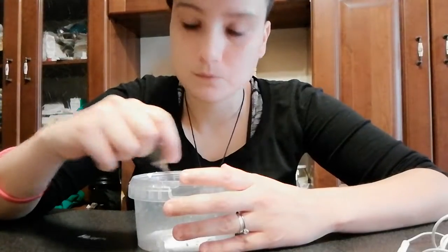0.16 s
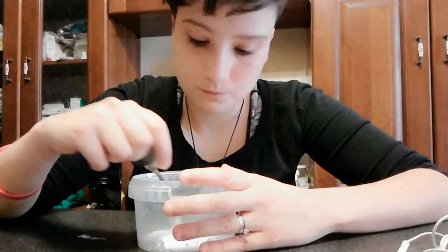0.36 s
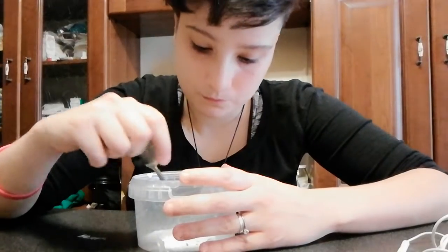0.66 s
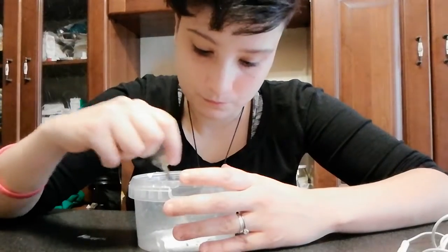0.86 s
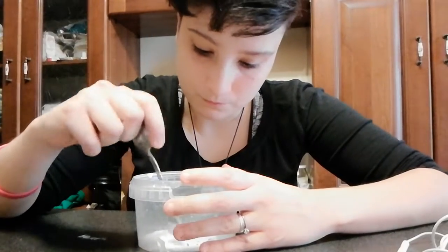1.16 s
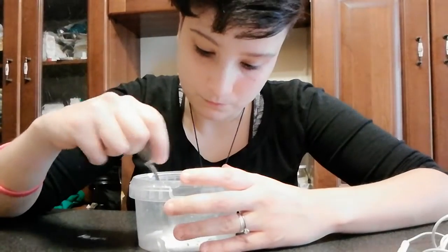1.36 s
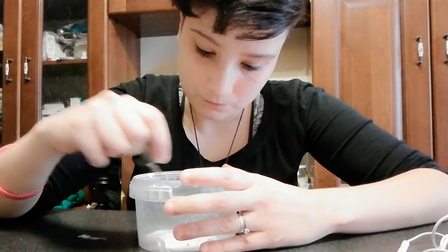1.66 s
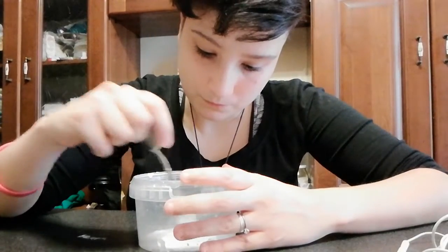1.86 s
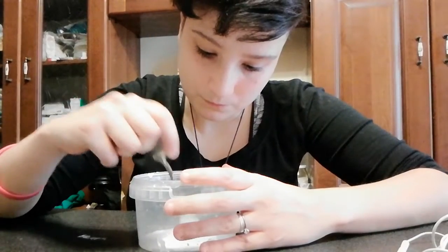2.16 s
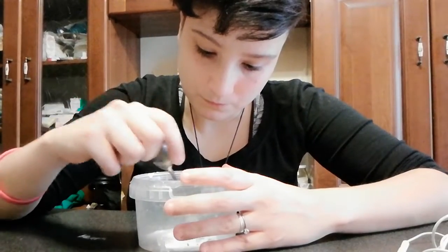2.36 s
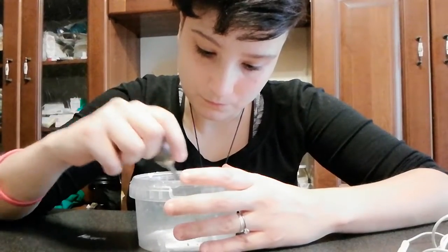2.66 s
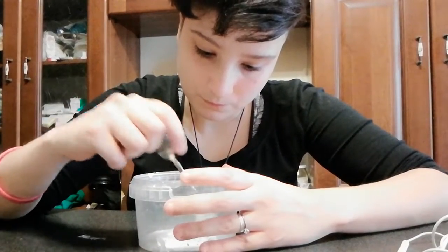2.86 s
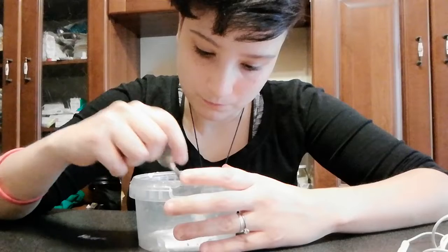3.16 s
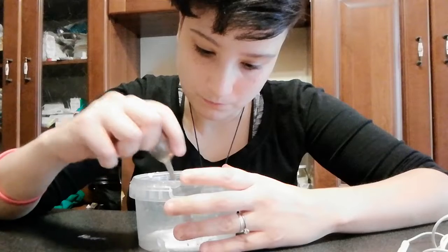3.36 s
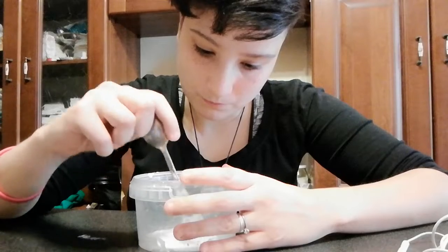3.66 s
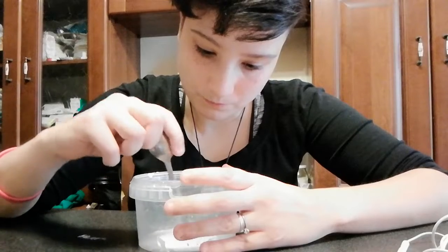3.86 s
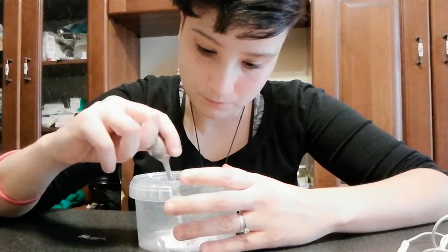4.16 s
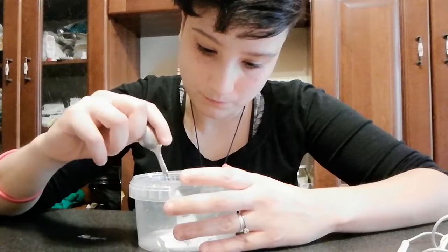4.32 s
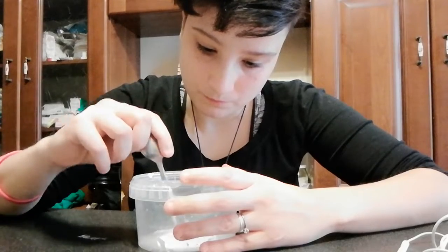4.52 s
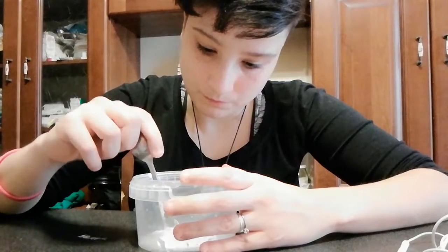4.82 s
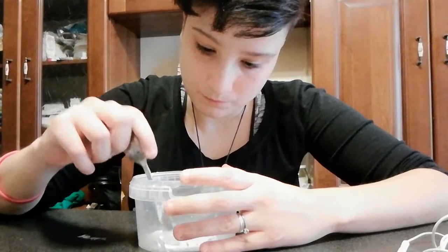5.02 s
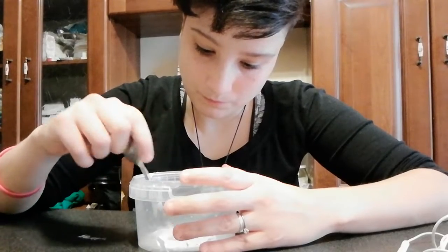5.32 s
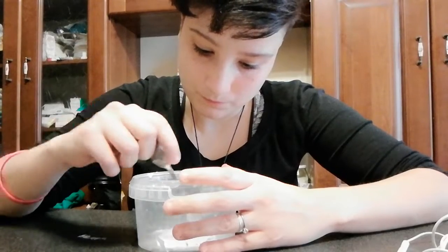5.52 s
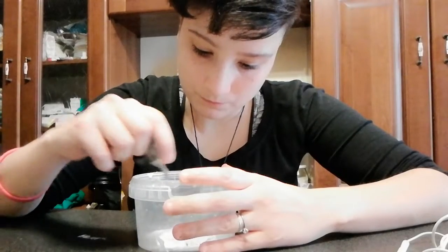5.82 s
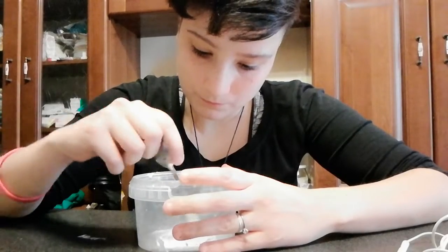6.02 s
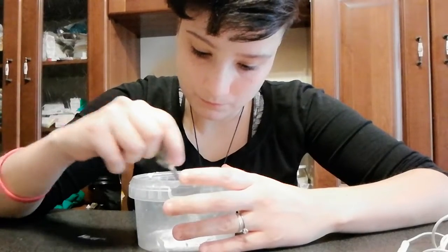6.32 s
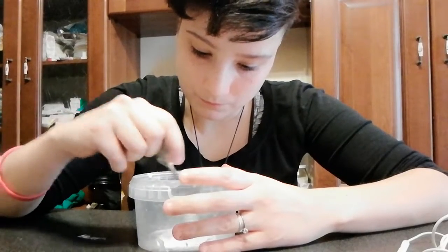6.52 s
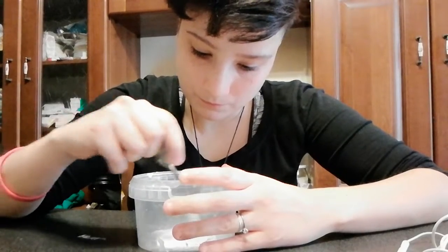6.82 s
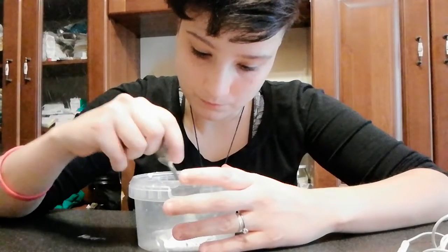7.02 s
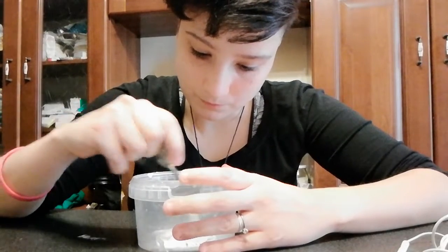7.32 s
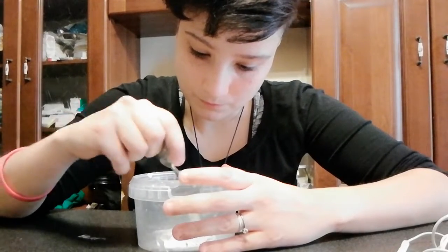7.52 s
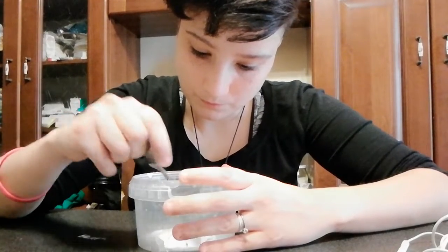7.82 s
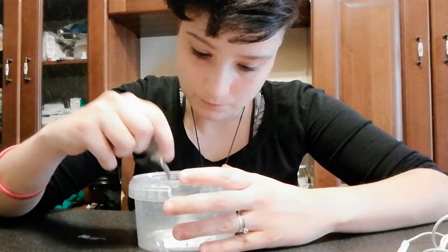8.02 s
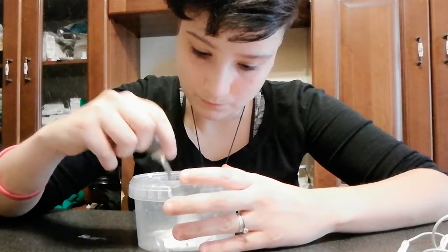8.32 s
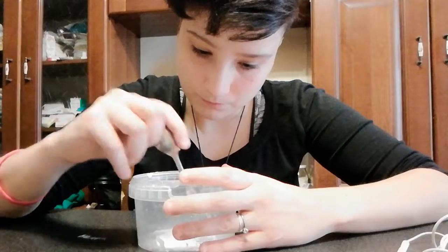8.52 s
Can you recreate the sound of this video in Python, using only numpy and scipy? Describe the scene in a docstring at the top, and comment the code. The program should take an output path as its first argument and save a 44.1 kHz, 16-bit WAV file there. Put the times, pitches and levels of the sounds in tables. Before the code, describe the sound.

Gentle squelchy rubbing, then regular knock-and-scrape turns of a spoon in a thick-filled plastic tub, close up in a quiet small room.

```python
"""Gentle sticky rubbing and juddering comes first: a metal spoon stirs slime in a plastic tub on a table.
Then come brisk turns, each a knock and a scrape; a second gentle spell comes before the last two turns.
Pulses ring the tub for the knocks, trains of slips ring it for the judders, random slips make the scrapes,
and short noise bursts make the sticky snaps. Soft bumps, a small furnished room and faint hiss lie behind."""
import sys
import numpy as np
from scipy import signal
from scipy.fft import rfft, irfft, next_fast_len
from scipy.io import wavfile

SR = 44100
rng = np.random.default_rng(int(sys.argv[2]) if len(sys.argv) > 2 else 0)


def dump_mix(stems):
    """Bounce the given channels to the path in sys.argv[1] as a 16-bit WAV at rate SR."""
    frames = np.atleast_2d(stems).T  # one column per channel
    limited = np.clip(frames, -1, 1)  # hard clip at full scale
    pcm = np.round(limited * 32767).astype(np.int16)
    wavfile.write(sys.argv[1], SR, pcm)


N = 382788
TIME = np.arange(N) / SR

# air and microphone hiss: spectrum (f/Hz, density/dB), left-right likeness (f/Hz, correlation)
FLOOR_SPECTRUM = [(25, -7.5), (35, -6.5), (52, 2), (74, -9), (110, -5), (150, -10), (205, -6.5),
                  (300, -15.5), (500, -19.5), (1000, -18.5), (2000, -25), (7000, -26.5), (10500, -33),
                  (15500, -34.5)]
EAR_LIKENESS = [(60, 0.99), (150, 1), (300, 0.36), (700, 0), (1650, 0.18), (5000, 0), (15000, 0)]
FLOOR_DB = -66
# near reflections off table, body and cupboards, before treble loss: (delay/s, left gain, right gain)
NEAR_ECHOES = [(.0016, -0.42, -0.57), (.00185, 0.17, -0.041), (.0034, -.2, 0.21), (.0044, 0.018, -0.38),
               (.0055, 0.18, -0.42), (.0061, -.3, 0.46), (0.013, -0.07, -0.063), (0.019, -0.29, -0.17),
               (0.025, 0.095, -0.035)]
# diffuse room tail, before each source's send level: (f/Hz, level/dB, decay by 60 dB/s)
ROOM_TAIL = [(72, 11, 0.81), (145.3, -4.5, 0.58), (262, 11, 0.36), (430, 6.5, 0.48), (730, 0, 0.41),
             (1480, 1.5, 0.47), (3043, -3, 0.49), (7560, 0.5, 0.65), (16200, -4, 0.66)]
# standing waves of the room, before each source's send level: (f/Hz, level/dB)
STANDING_WAVES = [(52, -20), (66.5, 19), (109, 21), (123, -13), (180, 13), (285, 6), (675, 5), (787, 3),
                  (1394, 6.5), (1438, 5.5)]
STANDING_WAVE_WIDTH_HZ = 6.5
# soft bumps of the tub on the table: (centre t/s, length/s, peak level/dB, f/Hz)
TABLE_BUMPS = [(1.092, 0.0525, -53, 116), (3.425, 0.04, -51.5, 118.5)]
# sticky snaps and grazes of the spoon: (t/s, peak level/dB before a common trim)
STICKY_SNAPS = [(.235, -56), (.305, -55), (0.586, -54), (.701, -58), (3.546, -58.5), (4.247, -44),
                (5.93, -55), (6.118, -53.5), (6.184, -68), (6.443, -53), (7.205, -56)]
# hollow of the tub over the slime: (f/Hz, width/Hz, level/dB)
TUB_HOLLOW = [(901, 31, 2), (970, 165, -3)]
# spoon sticks and slips:
# (centre t/s, length/s, wall level/dB, flexing wall f/Hz, base thrum level/dB), levels before a common trim
STICK_SLIPS = [(0.151, 0.035, -50, 960, -76.5), (0.25, 0.046, -61, 1000, -65.5),
               (0.385, 0.064, -64, 1090, -62.5), (0.452, 0.026, -46.5, 1015, -74),
               (0.529, 0.049, -58, 660, -59.5), (0.584, 0.016, -61.5, 945, -81),
               (0.717, 0.031, -48.5, 1027, -84), (0.809, 0.047, -49.5, 740, -62),
               (3.466, 0.05, -79, 900, -66), (3.538, 0.024, -54.5, 840, -62.5),
               (4.601, 0.018, -51.5, 940, -67), (5.573, 0.078, -66, 930, -71),
               (5.661, 0.013, -52.5, 970, -73), (5.93, 0.03, -64, 970, -77), (6.19, 0.041, -63.5, 875, -70),
               (6.65, 0.051, -70.5, 940, -79), (6.72, 0.047, -79, 950, -64.5),
               (6.956, 0.019, -56.5, 975, -74), (7.196, 0.019, -59, 940, -72),
               (7.44, 0.026, -56, 926, -68.5)]
# the base thrums at one pitch, and its swell is centred just ahead of the wall's
THRUM_HZ, THRUM_LENGTH_S, THRUM_LEAD_S = 261, 0.032, 0.00826
# gentle strokes through the slime: (full pressure t/s, swell/s, hold/s, pressure level/dB)
GENTLE_STROKES = [(0.0, .02, 0.013, -59.5), (0.129, 0.064, 0.024, -62), (0.27, 0.059, .04, -58.5),
                  (0.418, 0.069, 0.042, -55.5), (0.571, 0.14, 0.022, -61), (0.698, 0.028, 0.011, -58.5),
                  (0.833, 0.074, 0.032, -60.5), (5.569, 0.056, 0.036, -56.5), (5.649, 0.012, 0.014, -54),
                  (5.79, 0.013, 0.013, -62.5), (5.859, 0.006, .015, -59.5), (5.926, 0.023, 0.0071, -52.5),
                  (6.113, .015, .01, -65.5), (6.181, 0.019, 0.011, -58), (6.447, 0.15, 0.035, -63.5),
                  (6.732, .15, 0.06, -65), (6.89, 0.067, 0.1, -66), (7.2, 0.08, .025, -63.5),
                  (7.372, 0.097, 0.12, -67), (7.567, .06, 0.053, -70.5)]
RUB_SWELL_DB = 9.5  # gained during the swell
# spells when the spoon never leaves the slime: (from t/s, to t/s)
GENTLE_SPELLS = [(0, .89), (5.45, 7.64)]
DRAG_DB = -72.5  # steady drag in those spells
# a scrape starts this far from its knock's listed level; every stroke dies away at the same pace
BITE_DB, RELEASE_DB_PER_S = -41, 275
# colour of the scrape: (f/Hz, density/dB)
SCRAPE_COLOUR = [(150, -3), (550, -8), (750, -15), (1100, -3), (1500, -7.5), (2400, -3), (3500, -2.5),
                 (4500, -5.5), (5300, -11.5), (7500, -14.5), (10000, -30), (15000, -37)]
# resonances that stand out of the scrape, before that colour: (f/Hz, width/Hz, level/dB)
SCRAPE_RESONANCES = [(1410, 130, 2.5), (1788, 138, 5.5), (2217, 48, 3.5), (2850, 41, -18), (3210, 176, 1.5),
                     (3608, 115, 5.5), (3890, 130, -2.5), (4480, 550, -6)]
# brisk turns, knock then scrape:
# (t/s, knock level/dB before a common trim, wall spot f/Hz, base thud level/dB,
#  edge tick level/dB before a common trim, scrape swell/s, scrape hold/s, scrape pressure level/dB)
BRISK_TURNS = [(1.2875, -25.5, 1060, -8, -20, 0.067, 0.011, -57.5),
               (1.6926, -22, 975, -5, -22.5, 0.027, .025, -55),
               (2.0387, -22, 1214, -10.5, -19.5, .02, 0.052, -56),
               (2.356, -23, 920, -2.5, -14.5, 0.046, 0.022, -56),
               (2.6901, -27.5, 920, -2.5, -23.5, .07, 0.016, -55.5),
               (3.0343, -27.5, 1100, -7, -23.5, 0.048, 0.035, -59),
               (3.408, -44, 1230, 12.5, -4, 0.09, 0.021, -51),
               (3.784, -26, 770, 6, -23.5, 0.075, .035, -46.5),
               (4.1409, -21, 885, 2, -15.5, 0.096, 0.0025, -49),
               (4.4636, -28, 930, 2, -16, 0.08, 0.0087, -41), (4.775, -51, 1150, -9, -8, 0.055, .045, -47),
               (5.0949, -29.5, 826, 0.2, -17.5, .048, 0.037, -47),
               (5.3459, -25, 935, 1, -13.5, 0.042, 0.015, -51.5),
               (7.8532, -21.5, 1126, -6, -13.5, 0.058, 0.069, -58),
               (8.2144, -21, 1030, -5.5, -21, 0.016, 0.018, -46.5)]
# struck wall, before each blow's shifts, and base, damped by slime and hand: (f/Hz, width/Hz, level/dB)
WALL_MODES = [(734, 170, -1), (868, 125, 3), (1123, 160, -0.5), (1397, 136, -6.5), (1677, 125, -8)]
BASE_MODES = [(187, 258, -0.46)]
CUTOFF_HZ = 15800


def amp(db):
    """Decibels to gain."""
    return 10 ** (np.asarray(db) / 20)


def rms_one(x):
    """Scale to unit rms."""
    return x / np.sqrt(np.mean(x ** 2) + 1e-20)


def at_hz(table, hz, axis=1):
    """Read a column of a table on a log-frequency axis."""
    table = np.array(table)
    return np.interp(np.log(hz), np.log(table[:, 0]), table[:, axis])


def add(out, s, sound):
    """Mix a sound in from time s."""
    start = max(round(s * SR), 0)
    out[..., start:start + sound.shape[-1]] += sound[..., :N - start]


def resonate(x, modes):
    """Sum parallel two-pole resonances (f/Hz, width/Hz, level/dB)."""
    out = 0
    for hz, width, db in modes:
        r = np.exp(-np.pi * width / SR)
        poles = [1, -2 * r * np.cos(2 * np.pi * hz / SR), r * r]
        ring = signal.lfilter([1, 0, -1], poles, x + 1e-18)
        out = out + amp(db) * (1 - r * r) / 2 * ring
    return out


def colour(x, spectrum):
    """Give a noisy signal a smooth spectrum."""
    size = next_fast_len(N)
    gain = amp(at_hz(spectrum, np.fft.rfftfreq(size, 1 / SR) + 1))
    return irfft(rfft(x, size) * gain, size)[..., :N]


def flicker(rate):
    """Smooth random motion of unit spread that turns about rate times a second."""
    steps = np.cumsum(rng.exponential(1, N // 50)) / rate
    return rms_one(np.interp(TIME, steps, rng.standard_normal(N // 50)))


def stereo_bands(size):
    """Half-octave bands of diffuse noise, most alike at both ears in the bass: (f/Hz, band)."""
    edges = 22 * 2 ** np.arange(0, 10, .5)
    white = rng.standard_normal((2, 2, size))
    for k, (low, high) in enumerate(zip(edges, edges[1:])):
        band = signal.butter(2, [low, high], "band", fs=SR, output="sos")
        # neighbouring bands take different noise
        mid, side = signal.sosfilt(band, white[k % 2])
        hz = np.sqrt(low * high)
        alike = at_hz(EAR_LIKENESS, hz)
        yield hz, np.sqrt((1 + alike) / 2) * mid + np.sqrt((1 - alike) / 2) * side * [[1], [-1]]


def floor():
    """Quiet room rumble under microphone hiss: shaped bands of diffuse noise."""
    bands = sum(amp(at_hz(FLOOR_SPECTRUM, hz)) * band for hz, band in stereo_bands(N))
    return amp(FLOOR_DB) * rms_one(bands)


def room_response(build_s=0.0014, clump_db=0.5, close_db=9.0, close_s=0.0041):
    """What follows the direct sound: (near echoes, diffuse tail with ringing standing waves)."""
    t = TIME[:SR]
    near, tail = np.zeros((2, SR)), 0
    for delay, left, right in NEAR_ECHOES:
        near[:, round(delay * SR)] += left, right
    # soft, uneven surfaces send little treble back
    near = signal.sosfilt(signal.butter(1, 4000, fs=SR, output="sos"), near)
    # reflections off the furniture arrive in clumps
    clumps = amp(clump_db * flicker(160)[:SR])
    # hands, rim and table scatter strongly in the first milliseconds
    clumps = clumps * (1 + amp(close_db) * np.exp(-t / close_s))
    for hz, band in stereo_bands(SR):
        decay = amp(-60 * t / at_hz(ROOM_TAIL, hz, axis=2))
        fade = clumps * decay * (1 - np.exp(-t / build_s))
        tail = tail + amp(at_hz(ROOM_TAIL, hz)) * band * fade / np.linalg.norm(fade)
    modes = [(hz, STANDING_WAVE_WIDTH_HZ, db) for hz, db in STANDING_WAVES]
    return near, tail + resonate(signal.unit_impulse(SR), modes)


def in_room(x, response):
    """Direct sound plus what the room returns."""
    return x + signal.fftconvolve(np.atleast_2d(x), response, axes=1)[:, :N]


def bumps():
    """The held tub rocks softly against the table top: low sines that swell and fade."""
    out = np.zeros(N)
    for s, length, db, hz in TABLE_BUMPS:
        size = round(length * SR)
        thump = np.hanning(size) * np.sin(2 * np.pi * hz * TIME[:size])
        add(out, s - length / 2, amp(db) * thump)
    return out


def snaps(fade_s=0.003, trim_db=-1.0):
    """Slime lets go of the plastic: a short crackle of noise rings the hollow and upper resonances."""
    out, t = np.zeros(N), TIME[:SR // 25]
    for s, db in STICKY_SNAPS:
        crackle = rng.standard_normal(len(t)) * np.exp(-t / fade_s)
        sound = resonate(crackle, TUB_HOLLOW + [(1900, 350, -1), (3680, 1300, -1)])
        add(out, s, amp(db + trim_db) * sound / np.abs(sound).max())
    return out


def judders(slips_per_s=115, uneven=0.2496, width_hz=160, rasp=0.043, sag_per_s=3.33, trim_db=-1.5):
    """Uneven trains of slips, each ringing the flexing plastic, swell and die away."""
    out = np.zeros(N)
    t = TIME[:SR // 5] - TIME[SR // 10]
    walls = [(s, length, db, hz) for s, length, db, hz, _ in STICK_SLIPS]
    bases = [(s - THRUM_LEAD_S, THRUM_LENGTH_S, db, THRUM_HZ) for s, *_, db in STICK_SLIPS]
    for s, length, db, hz in walls + bases:
        gaps, sizes = rng.standard_normal((2, 40))
        times = np.cumsum(np.exp(uneven * gaps)) / slips_per_s
        # one slip falls at the centre of the swell
        at = np.round((times - times[20]) * SR).astype(int) + SR // 10
        inside = (at >= 0) & (at < len(t))
        slips = rasp * rng.standard_normal(len(t))
        slips[at[inside]] += amp(3.0 * sizes[inside])
        swell = np.exp(-(1.68 * t / length) ** 2)
        sound = resonate(slips * swell, [(hz, width_hz, 0)])
        sound = resonate(sound, [(hz, 3 * width_hz, 0)])
        # the pitch sags as the plastic relaxes
        sound = np.interp(t - sag_per_s * t ** 2 / 2, t, sound)
        level = amp(db + trim_db) * np.sqrt(length * SR) / np.linalg.norm(sound)
        add(out, s - TIME[SR // 10], level * sound)
    return out


def slip_rain(per_s, spread_db, alike):
    """Tiny slips of uneven size; the curved wall sends partly different ones to each side."""
    sizes = amp(spread_db * np.minimum(rng.exponential(1, (3, N)), 4))
    signs = rng.choice([-1, 1], (3, N))
    slips = sizes * signs * (rng.random((3, N)) < per_s / SR)
    return np.sqrt(alike) * slips[0] + np.sqrt(1 - alike) * slips[1:]


def stroke(full_s, swell_s, hold_s, db, climb_db):
    """Level of one stroke in dB: it climbs to full pressure, holds, and is released."""
    to_come = np.maximum(full_s - TIME, 0) / swell_s
    released_s = np.maximum(TIME - full_s - hold_s, 0)
    return db - climb_db * to_come - RELEASE_DB_PER_S * released_s


def pressure(rebound_s=0.0099):
    """How hard the spoon scrapes, in dB: the strongest of drag, gentle strokes and scrapes after knocks."""
    level = np.full(N, -120.0)
    for start, end in GENTLE_SPELLS:
        level[(TIME >= start) & (TIME < end)] = DRAG_DB
    for s, swell_s, hold_s, db in GENTLE_STROKES:
        level = np.maximum(level, stroke(s, swell_s, hold_s, db, RUB_SWELL_DB))
    # the harder the knock, the harder the edge bites once it has settled on the wall
    for s, knock_db, *_, swell_s, hold_s, db in BRISK_TURNS:
        scrape = stroke(s + swell_s, swell_s, hold_s, db, db - (knock_db + BITE_DB))
        level = np.where(TIME > s + rebound_s, np.maximum(level, scrape), level)
    return level


def scrapes(chatter_db=2.0, wander_db=4.0, hollow_db=-61.5, hollow_growth=0.75):
    """The spoon's edge rasps over the plastic; the slime it drags squelches in the hollow of the tub."""
    stroke_db = pressure()
    # the edge catches and frees itself many times in a stroke
    grip = amp(chatter_db * flicker(260))
    grit = slip_rain(per_s=2500, spread_db=1.0, alike=0.32)
    # the contact travels round the wall, waking now one resonance, now another
    rings = sum(amp(wander_db * flicker(30)) * resonate(grit, [mode]) for mode in SCRAPE_RESONANCES)
    rasp = amp(stroke_db) * rms_one(grip * colour(grit + rings, SCRAPE_COLOUR))
    # the squelch grows more slowly with force than the rasp, so it counts for more in gentle stirring
    tack = slip_rain(per_s=970, spread_db=4.5, alike=0.76)
    hollow = resonate(resonate(tack, TUB_HOLLOW), [(930, 740, 0)])
    squelch_db = hollow_db + hollow_growth * (stroke_db + 56.5)
    return rasp + amp(squelch_db) * rms_one(grip * hollow)


def knocks(contact_s=.0001, wall_top_hz=1950, lean_db=56.0, tick_s=0.0021, tick_trim_db=2.0,
           trim_db=1.5, spot_db=1.56, detune=0.026):
    """A brief push rings wall and base for a few cycles; the spoon's edge adds a gritty tick."""
    out = np.zeros(N)
    t = TIME[:SR // 16] - .002  # room ahead of the push, s
    push = np.exp(-.5 * (t / contact_s) ** 2)
    # slime smothers the wall's higher modes
    push = signal.sosfilt(signal.butter(6, wall_top_hz, fs=SR, output="sos"), push)
    for s, db, hz, thud_db, edge_db, *_ in BRISK_TURNS:
        # a stiff spot on the wall favours the upper modes, a slack one the lower
        tilt_db = lean_db * np.log2(hz / 1000)
        # the grip and the shifting slime retune and reweight the modes from blow to blow
        shifts = rng.standard_normal((len(WALL_MODES), 2))
        modes = []
        for (f, width, g), (df, dg) in zip(WALL_MODES, shifts):
            mode_db = g + tilt_db * np.log2(f / 1000) + spot_db * dg
            modes.append((f * (1 + detune * df), width, mode_db))
        wall = resonate(push, modes)
        body = wall + amp(thud_db) * resonate(push, BASE_MODES)
        bite = rng.standard_normal(len(t)) * np.exp(-np.abs(t) / tick_s) * (t > 0)
        tick = resonate(bite, [(2510, 800, 2), (3350, 1100, 0), (6900, 1500, -25)])
        tick = signal.sosfilt(signal.butter(4, 8800, fs=SR, output="sos"), tick)
        # the tick is set against the energy of the wall
        tick = tick * amp(edge_db + tick_trim_db) * np.linalg.norm(wall) / np.linalg.norm(tick)
        level = amp(db + trim_db) / np.abs(body).max()
        add(out, s - TIME[np.argmax(body)], level * (body + tick))
    return out


def scene():
    """Every contact sounds in one room, with its own send to the tail; the floor lies beneath."""
    near, tail = room_response()
    struck = in_room(knocks(), near + amp(1.0) * tail)
    rubbed = in_room(judders() + snaps(), near + amp(-5.5) * tail)
    scraped = in_room(scrapes() + bumps(), amp(-11.5) * tail)
    return struck + rubbed + scraped + floor()


def record(dry):
    """A steep low-pass cuts the top."""
    return signal.sosfilt(signal.ellip(10, .1, 70, CUTOFF_HZ, fs=SR, output="sos"), dry)


dry = scene()
out = record(dry)
dump_mix(out)
```